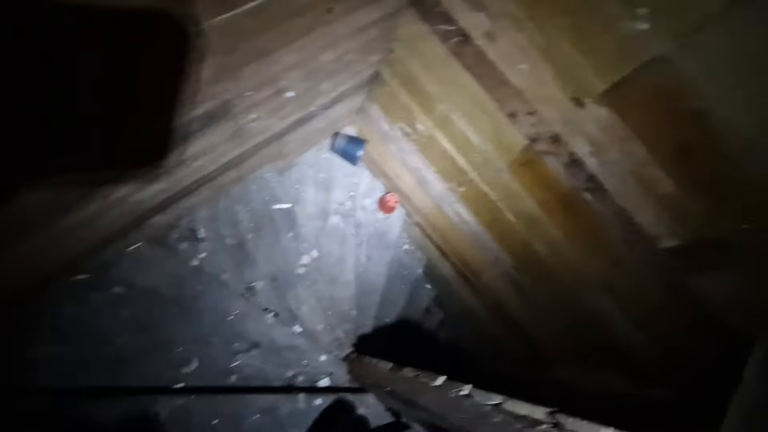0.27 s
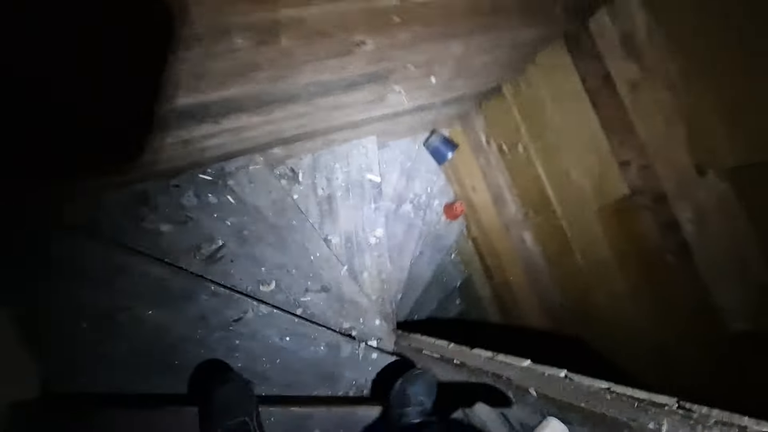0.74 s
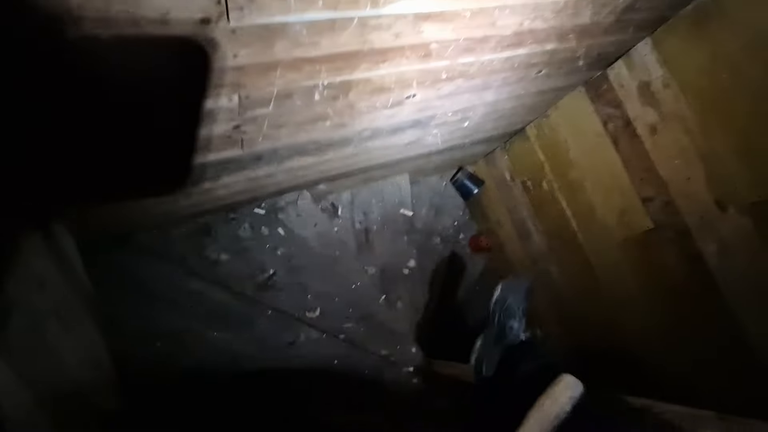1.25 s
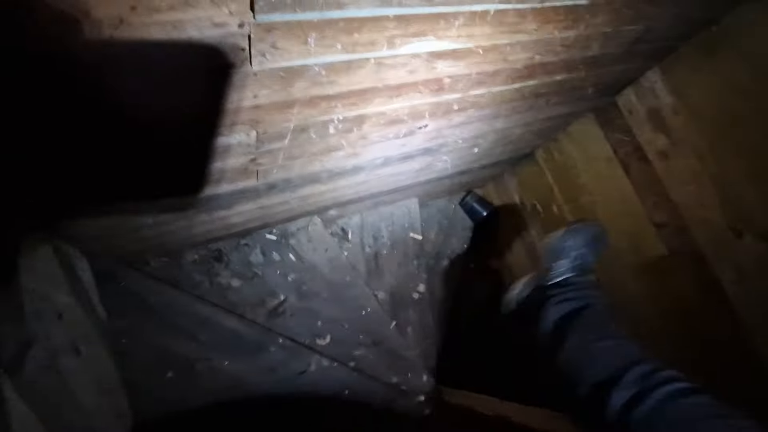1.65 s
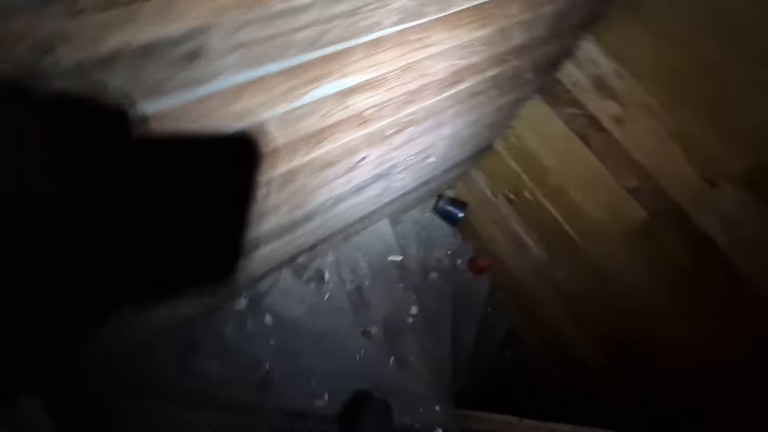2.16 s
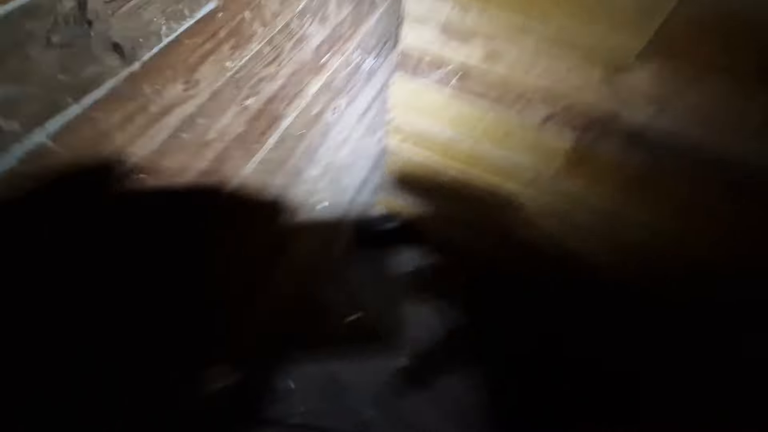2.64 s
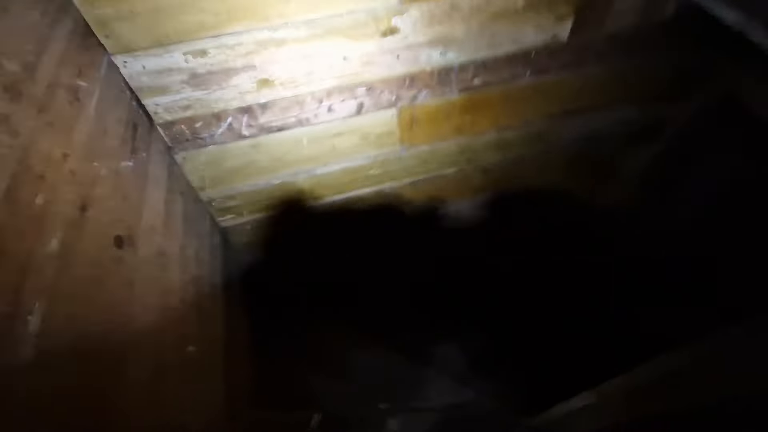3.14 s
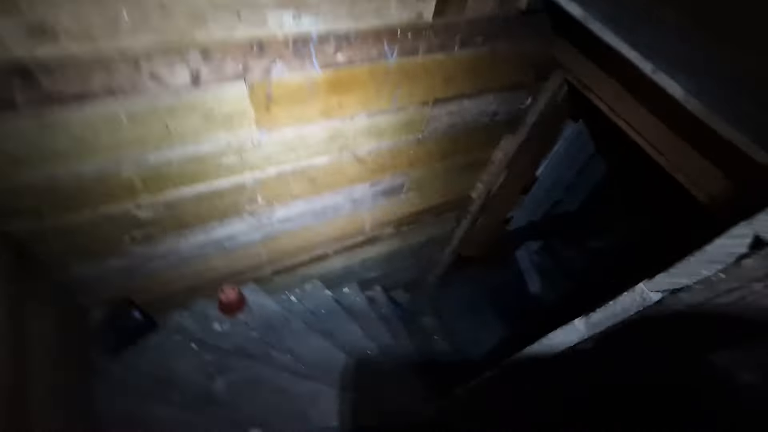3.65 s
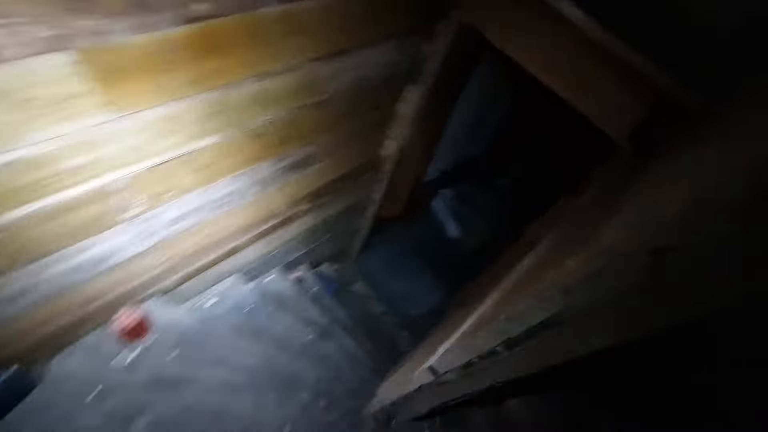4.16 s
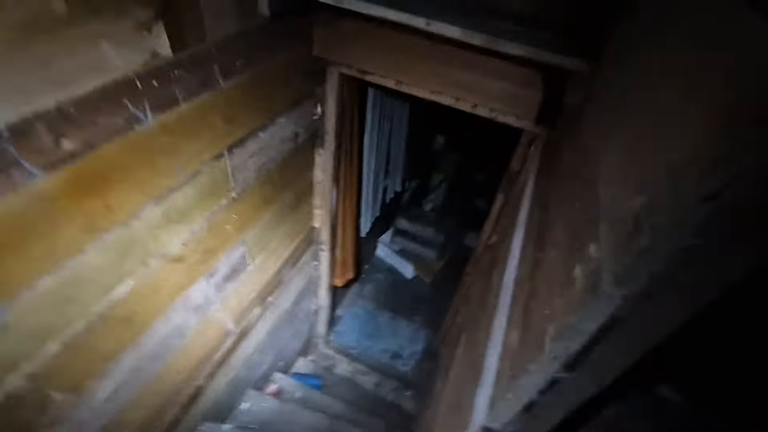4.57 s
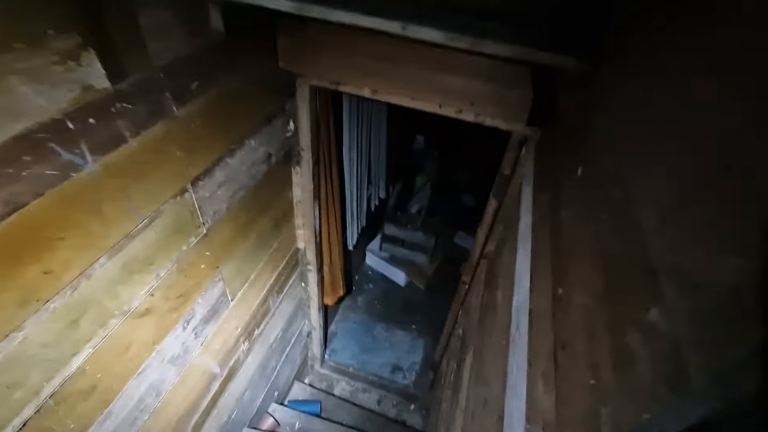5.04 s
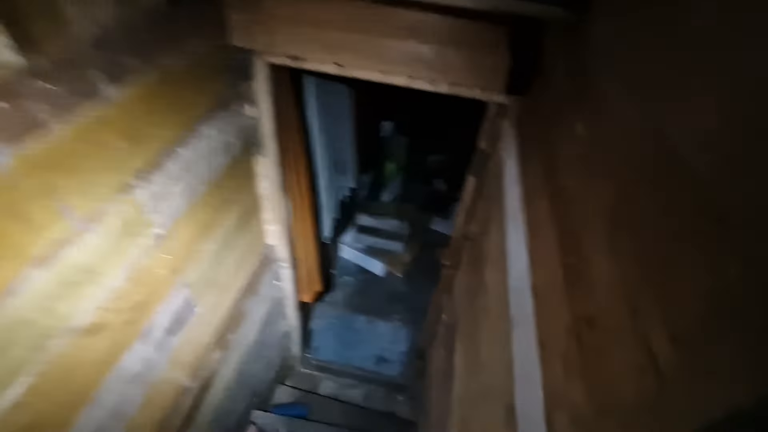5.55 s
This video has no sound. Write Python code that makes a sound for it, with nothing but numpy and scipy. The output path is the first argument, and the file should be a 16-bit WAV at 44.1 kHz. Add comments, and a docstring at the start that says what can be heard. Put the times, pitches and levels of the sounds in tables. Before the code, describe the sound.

Close stereo microphones in a quiet, empty wooden attic. A splinter ticks at the start, then light boot steps knock and murmur the planks. Steps grow heavier, with a hard cracking blow near three seconds, then clothes rustle and two more deep heel thuds fall. A tiny metal tag rings very high between them. Low rumble throughout.

```python
"""Two microphones in a quiet, empty building, someone in boots on old attic floorboards close by.
All along the building rumbles low, the boards murmur and clothes rustle near the microphones.
First a splinter ticks, then light steps knock the planks, with one very faint tinkle of a metal tag.
From 2.4 s the steps towards a steep wooden stair grow heavy: heels thud, planks knock or groan and
grit cracks, loudest near 3 s; more thuds follow at 4.3 and 5.7 s, with the tag ringing between them."""
import sys
import numpy as np
from scipy import signal
from scipy.io import wavfile
from scipy.ndimage import uniform_filter1d

SR = 44100
rng = np.random.default_rng(int(sys.argv[2]) if len(sys.argv) > 2 else 0)


def dump_mix(stems):
    """Bounce the given channels to the path in sys.argv[1] as a 16-bit WAV at rate SR."""
    frames = np.atleast_2d(stems).T  # one column per channel
    limited = np.clip(frames, -1, 1)  # hard clip at full scale
    pcm = np.round(limited * 32767).astype(np.int16)
    wavfile.write(sys.argv[1], SR, pcm)


N = 255780  # samples, 5.8 s

# Building and boards at rest. Each row: time in seconds, rumble level in dB, board murmur level in dB.
FLOOR_LEVELS = [(0, -44, -49), (.7, -41, -51), (1.1, -42.5, -51.5), (1.6, -43.5, -50.5),
                (2.3, -42.5, -49.5), (3.2, -43.5, -50.5), (3.9, -45.5, -51.5), (4.6, -46.5, -53.5),
                (5.2, -47.5, -57.5), (5.8, -46, -52)]
# Boards murmuring louder under a foot. Each row: time of most weight in seconds, murmur level in dB.
LOADINGS = [(.72, -46), (1.42, -44.5), (2.55, -45.5), (3.0, -47.5), (4.38, -48.5), (4.8, -50)]
# Colour of the building's rumble. Each row: frequency in Hz, relative level in dB per Hz.
RUMBLE_COLOUR = [(8.8, -35), (15, -5.5), (59, 3), (200, -15), (260, -46), (440, -120)]
# Colour of the boards' murmur. Each row: frequency in Hz, relative level in dB per Hz.
MURMUR_COLOUR = [(71, -46), (120, -3), (161, 5), (216, 0), (529, -7.5), (877, -9.5), (975, -12),
                 (1290, -14), (1420, -9.5), (2000, -43), (2600, -15), (4400, -120)]
# Likeness of the two microphones in noise. Each row: frequency in Hz, correlation from -1 to 1.
LIKENESS = [(60, 0.99), (130, 0.96), (290, 0.89), (640, 0.63), (1410, -0.17), (3100, 0.007), (6820, 0.11),
            (15000, -0.049)]
# Decay of the attic. Each row: frequency in Hz, time to fall by 60 dB in seconds.
ATTIC_DECAY = [(60, 0.58), (150, 0.067), (500, 0.28), (1500, 0.2), (5000, 0.21), (14000, 0.08)]
# Clothes in motion. Each row: time in seconds, rustle level in dB, sheen (treble) in dB, coarse rub in dB.
CLOTH_MOTION = [(0, -63.5, -1.5, 8.5), (.42, -63, 1.5, 1), (.9, -59.5, 1.5, -0.5), (1.4, -59.5, 2, 2),
                (1.52, -62, 1, 0), (1.59, -74, 1, 3), (1.78, -72, -3, 11.5), (2.05, -64, -2, 6),
                (2.3, -66.5, -1, 8), (2.43, -57, -0.5, 8), (2.7, -54.5, 3.5, 8), (2.9, -55, 1, 3),
                (3.08, -49, 1.5, 7.5), (3.22, -55, -2, 3), (3.66, -51.5, -6, 0), (3.91, -59, -5, -2.5),
                (4.25, -53.5, -4, 1), (4.55, -53.5, -2.5, -2.5), (4.66, -58.5, -4.5, 2.5),
                (4.97, -57, -5, 4), (5.1, -68, -3, 1), (5.4, -65.5, -6, 0), (5.8, -55.5, -6, 2.5)]
# Sleeve or trouser leg swishing past. Each row: start in seconds, length in seconds, level in dB.
SWISHES = [(0.25, 0.048, -65), (0.501, .08, -59.5), (0.67, 0.13, -53), (1.392, 0.093, -56.5),
           (1.623, 0.047, -67), (2.12, 0.075, -64), (2.596, 0.13, -60), (2.845, 0.027, -52.5),
           (3.26, 0.12, -53.5), (3.463, .16, -51), (4.57, 0.033, -58), (5.27, 0.045, -73)]
# Colour of the cloth. Each row: frequency in Hz, relative level in dB per Hz.
CLOTH_COLOUR = [(530, -31), (900, -0.5), (1080, -9.5), (1220, -6.5), (1460, -5), (2420, -7), (3110, -8.5),
                (3860, -8.5), (5750, -6), (8550, -12), (10900, -12), (12900, -9), (16000, -14.5)]
# Jolts of the metal tag. Each row: start in seconds, peak level in dB.
TINKLES = [(1.6172, -59), (2.592, -42), (4.8733, -40), (4.8803, -35), (4.8904, -37.5), (5.2789, -53)]
# Modes of the tag. Each row: frequency in Hz, relative level in dB, time to fall by 60 dB in seconds.
TAG_MODES = [(13400, 0, 0.066), (14800, -10, .09)]
# Splinter letting go. Each row: start in seconds, level in dB, pitch in Hz, length in cycles.
TICKS = [(.0147, -18.5, 1520, 1.33), (.1479, -31, 1360, 1), (.178, -42, 1300, 2.1),
         (2.335, -35.5, 1400, 1.3)]
# Grit under a sole. Each row: start in seconds, peak level in dB, extra fine dust in dB, left minus right in dB.
CRACKS = [(.416, -33, 5, 7), (1.5446, -42, 5, 7), (2.072, -37.5, -12, 0), (2.1146, -36, 3, -5),
          (2.152, -36.5, 13, -8), (2.3825, -26, 4, 3), (2.4604, -17.5, 4, 4.5), (2.4955, -16.5, 6.5, 2.5),
          (2.9028, -36, 0, -12), (2.958, -24, 4, -6), (2.9684, -2.5, 0.5, -4), (3.035, -18, -4, -5),
          (3.261, -35.5, -23, -12), (3.3424, -33, -3, -12), (4.273, -17, -3.5, -6), (4.3277, -33, -3, -10),
          (4.569, -35.5, 13, -18), (4.8685, -34, -5, -9), (5.4253, -44, -12, -11), (5.5785, -40, -2, -10),
          (5.652, -35, 5, -9), (5.673, -34, 5, -3), (5.6905, -25, -4, -4), (5.7488, -19, 5, -5),
          (5.7894, -29, 2, -8)]
# Colour of the grit. Each row: frequency in Hz, relative level in dB per Hz.
GRIT_COLOUR = [(590, -77), (1000, -8), (1220, -14), (2280, -13.5), (2560, -19.5), (3500, -9.5), (4170, -14),
               (5700, -10), (10100, -23), (13400, -18.5), (16000, -24)]
# Planks knocking or groaning together. Each row: start in seconds, peak level in dB, loudest pitch in Hz,
# left minus right in dB, contact time in seconds, fall of the modes away from that pitch in dB per octave.
KNOCKS = [(.412, -29, 650, 4.5, 0.024, 7.5), (.612, -34.5, 815, 4, 0.009, 25),
          (.631, -34, 850, 0, 0.0089, 23), (.7, -34, 440, 6, .015, 46), (.748, -35, 784, 8, 0.03, 42),
          (.773, -31.5, 470, 3.5, 0.046, 18), (1.35, -30.5, 510, 5, 0.086, 11),
          (1.407, -24.5, 576, 1.5, 0.026, 7), (1.41, -35, 1460, 15, .039, 6),
          (1.47, -37, 2550, 4, 0.041, 59), (1.547, -39, 550, 5, 0.012, 22), (1.838, -40, 695, 4, 0.02, 52),
          (1.94, -39, 695, 2, 0.016, 29), (2.063, -24.5, 536, 2.5, 0.053, 14),
          (2.117, -26.5, 800, 1, 0.035, 25), (2.12, -28, 2160, 3, 0.026, 28),
          (2.38, -20.5, 480, 6, .012, 10), (2.463, -20.5, 615, 1.5, 0.012, 1),
          (2.497, -19.5, 520, 1, 0.0077, 2), (2.57, -32, 900, -4, 0.019, 20),
          (2.706, -28.5, 850, 2, 0.014, 23), (2.87, -27.5, 616, -12, 0.0035, 22),
          (2.958, -6.5, 257, 0, .011, 16.5), (2.967, -8.5, 900, 3, .011, 7),
          (3.036, -14.5, 615, 4.5, 0.012, 23), (3.225, -38, 418, 0, 0.018, 16),
          (3.252, -38.5, 695, 11, 0.024, 38), (3.368, -32, 700, 2.5, 0.035, 70),
          (3.52, -34.5, 695, 3, 0.039, 25), (3.57, -28, 1020, -5, 0.0088, 37),
          (3.772, -33, 890, 2, 0.032, 39), (4.144, -32.5, 900, 7, 0.0066, 14),
          (4.272, -13.5, 230, 0, 0.016, 30), (4.272, -15, 512, -3, 0.0079, 29),
          (4.274, -30.5, 2220, 9, 0.01, 40), (4.419, -30, 1960, -6, 0.0063, 31),
          (4.454, -33, 516, 3, 0.02, 30), (4.519, -33.5, 817, 0, 0.038, 52),
          (4.52, -35, 2220, -4, 0.051, 35), (4.698, -24, 930, 2, 0.0089, 56),
          (4.702, -33, 2040, -4, 0.022, 44), (4.724, -23.5, 490, 0, 0.0064, 11.5),
          (4.815, -31, 1000, 0, 0.025, 55), (4.867, -26.5, 510, 1, .01, 7), (4.928, -33.5, 900, 0, .04, 41),
          (4.93, -41, 2220, -1, .024, 60), (5.036, -41.5, 895, 3, 0.011, 32),
          (5.578, -40, 910, 1, 0.0072, -4), (5.691, -10.5, 235, 1, 0.011, 23.5),
          (5.692, -21, 504, 2.5, 0.011, 40), (5.779, -33, 445, 2, 0.022, 20)]
# Modes of the planks. Each row: frequency in Hz, relative level in dB, time to fall by 60 dB in seconds.
PLANK_MODES = [(188.7, -8.5, 0.25), (231, -7, 0.12), (253, -7.5, 0.1), (308, -28, 0.099),
               (339.6, 1.5, 0.13), (379.5, 2.5, 0.078), (420, -4.5, 0.14), (520, 2.5, 0.044),
               (588, 0.5, 0.075), (627, -2, 0.049), (694.6, 4, 0.067), (794, 3, 0.071), (877, 7.5, 0.031),
               (975, -8.5, 0.021), (1055, 12.5, 0.016), (1330, 7, 0.043), (1456, 10, 0.047),
               (1520, 9, 0.04), (1626, 2, 0.04), (2000, 14.5, 0.015), (2160, -5, .025), (2216, 7, 0.044),
               (2260, -2, 0.027), (2520, -2, .025), (2840, 7, .025)]
# Heel and toe blows. Each row: start in seconds, level in dB, bending pitch of the board in Hz, cycles
# before it is damped.
THUDS = [(.412, -26, 298, 2.2), (.43, -30, 53, 1.2), (0.514, -32.5, 167, 5), (.615, -31, 65, 3.7),
         (1.362, -33.5, 160, 3.4), (1.406, -29, 330, 2.7), (2.066, -32, 350, 10),
         (2.379, -8.5, 129.7, 1.62), (2.478, -26.5, 149, 3.3), (2.495, -32, 53.6, 2),
         (2.545, -33, 71.5, 2.4), (2.58, -36, 87, 3), (2.868, -31.5, 127, 1.5), (2.957, -15, 159, 4.9),
         (2.959, -14, 374, 4.1), (2.972, -15.5, 356, 6.8), (3.471, -34, 192, 2.9), (4.272, -2, 353, 4.5),
         (4.275, -9.5, 165.6, 3.1), (4.725, -20.5, 185, 2.5), (4.765, -29, 149, 1.8), (5.52, -39, 59, 7.7),
         (5.689, -7.5, 135, 2.25), (5.691, -16.5, 303, 4.2)]
# Beams under the boards. Each row: frequency in Hz, relative level in dB, time to fall by 60 dB in seconds.
JOIST_MODES = [(63, -13, 0.36), (91, -6, 0.6), (114.5, 0.5, 0.31), (154.7, 1.5, 0.18), (182.6, -13, 0.4),
               (231, -0.5, 0.38), (282, -3, 0.27)]

LOADING_S = .09  # width of the bell-shaped swell of the murmur
SWISH_RISE_S, SWISH_FALL_S = 0.017, 0.024
SNAP_RISE_S, SNAP_FALL_S = .003, .002
CRUSH_S, CRUSH_SHARE = 0.011, 0.21  # the smaller grains after every snap
LOAD_S, LOAD_SHARE = 0.0014, 0.066  # a contact builds up in a short time plus a share of its length
JOISTS_DB = -58  # strength of the beams' answer to one sample of push
WALL_S, WALL_DB, WALL_HZ = .044, -14.5, 286  # delay, level and low-pass corner of the gable's echo
CLIP_LEVEL = .93  # share of full scale
BASS_HZ, EDGE_HZ = 32., 16200  # lower and upper limits of the microphone chain


def gain_of(db):
    """Decibels to a factor."""
    return 10 ** (np.asarray(db) / 20)


def evened(x):
    """Scaled to rms 1."""
    return x / np.sqrt(np.mean(x ** 2) + 1e-20)


def peaked(x):
    """Scaled to peak 1."""
    return x / np.abs(x).max()


def read(points, hz):
    """A table of (Hz, value) read on a log-frequency axis."""
    f, value = np.transpose(points)
    return np.interp(np.log(hz + 1), np.log(f + 1), value)


def add(mix, s, sound):
    """Mixes a sound into both channels at s seconds."""
    part = mix[:, round(s * SR):][:, :sound.shape[-1]]
    part += sound[..., :part.shape[1]]


def panned(x, pan_db):
    """Splits a left minus right level difference over the two channels."""
    return x * gain_of(np.array([[.5], [-.5]]) * pan_db)


def noise(shape_db, length, size, patchy_db):
    """Two-channel noise from random short-time spectra, coloured by shape_db(hz, t); bass is alike in both."""
    hop = size // 4
    frames, hz = length // hop + 5, np.fft.rfftfreq(size, 1 / SR)[:, None]
    a, b, c, d, patches = rng.standard_normal((frames, len(hz), 5)).T
    # random level patches, smooth over time and frequency
    patches = uniform_filter1d(patches, size=size // 64, axis=0)
    patches = evened(uniform_filter1d(patches, size=6, axis=1))
    same = np.clip(read(LIKENESS, hz), -1, 1)
    left = a + 1j * b
    right = same * left + np.sqrt(1 - same ** 2) * (c + 1j * d)
    level_db = shape_db(hz, np.arange(frames) * hop / SR) + patchy_db * patches
    spectra = np.array([left, right]) * gain_of(level_db)
    return signal.istft(spectra, nperseg=size, noverlap=size - hop)[1][:, :length]


def modes(table, tilt_db):
    """Impulse response of dying sines, each mode's level shifted by tilt_db(hz)."""
    t = np.arange(SR // 3) / SR
    return sum(gain_of(db + tilt_db(hz) - 60 * t / t60) * np.sin(2 * np.pi * hz * t)
               for hz, db, t60 in table)


def floor():
    """The building's low rumble and the lumpy murmur of boards that swells under weight."""
    s, rumble_db, murmur_db = np.transpose(FLOOR_LEVELS)
    t = np.arange(N) / SR
    rumble = evened(noise(lambda hz, t: read(RUMBLE_COLOUR, hz) + 0 * t, N, size=4096, patchy_db=1.0))
    murmur = evened(noise(lambda hz, t: read(MURMUR_COLOUR, hz) + 0 * t, N, size=1024, patchy_db=1.5))
    weight = sum(gain_of(db) ** 2 * np.exp(-((t - at) / LOADING_S) ** 2) for at, db in LOADINGS)
    murmur_gain = np.sqrt(gain_of(np.interp(t, s, murmur_db)) ** 2 + weight)
    return gain_of(np.interp(t, s, rumble_db)) * rumble + murmur_gain * murmur


def attic(x):
    """Dense reflections off bare planks, each band dying at its own speed."""
    tail = noise(lambda hz, t: -60 * t / read(ATTIC_DECAY, hz), SR // 2, size=512, patchy_db=1)
    tail = np.pad(tail, ((0, 0), (round(.004 * SR), 0)))  # 4 ms before the first reflections
    return signal.fftconvolve(x, tail / np.linalg.norm(tail[0]), axes=1)[:, :N]


def gable_echo(low):
    """The far gable returns the low blows once, late and dulled."""
    late = np.pad(low, ((0, 0), (round(WALL_S * SR), 0)))[:, :N]
    return signal.lfilter(*signal.butter(1, WALL_HZ, fs=SR), gain_of(WALL_DB) * late)


def cloth():
    """Fabric slides: fine hiss whose sheen and coarse rub change with movement, flickering as folds catch."""
    s, level_db, sheen_db, rub_db = np.transpose(CLOTH_MOTION)
    # weights from 0 to 1: sheen above 7500 Hz, rub below 4000 Hz
    high = lambda hz: np.clip(np.log2((hz + 1) / 7500) / 0.28, 0, 1)
    low = lambda hz: np.clip(np.log2(4000 / (hz + 1)) / 0.35, 0, 1)
    colour = lambda hz, t: (read(CLOTH_COLOUR, hz) + high(hz) * np.interp(t, s, sheen_db)
                            + low(hz) * np.interp(t, s, rub_db))
    hiss = noise(colour, N, size=256, patchy_db=1.5)
    # the band between the two sets the level scale
    core = signal.sosfilt(signal.butter(4, [4000, 8000], "band", fs=SR, output="sos"), hiss.mean(0))
    flicker_db = 0.93 * evened(uniform_filter1d(rng.standard_normal(N), size=600))
    t = np.arange(N) / SR
    power = gain_of(np.interp(t, s, level_db)) ** 2
    for start, length, db in SWISHES:
        corners = np.cumsum([start - SWISH_RISE_S, SWISH_RISE_S, length, SWISH_FALL_S])
        power = power + (gain_of(db) * np.interp(t, corners, [0, 1, 1, 0])) ** 2
    return panned(np.sqrt(power) * gain_of(flicker_db) * hiss / core.std(), -0.93)


def tag():
    """A small metal tag on the clothes, to the right, rings very high when it is jolted."""
    out, ring = np.zeros((2, N)), peaked(modes(TAG_MODES, lambda hz: 0))
    for s, db in TINKLES:
        add(out, s, panned(gain_of(db) * ring, -10.0))
    return out


def swings(table):
    """Wood first gives way, swings a few cycles under a rounded envelope and is damped."""
    out = np.zeros((2, N))
    for s, db, hz, cycles in table:
        turns = np.arange(0, cycles, hz / SR)
        envelope = np.sin(np.pi * (turns / cycles) ** 0.68) ** 1.3
        # the minus sign makes the first movement a giving way
        add(out, s, -gain_of(db) * envelope * np.sin(2 * np.pi * turns))
    return out


def splinter_ticks():
    """A splinter lets go with a dry tick of a cycle or two, to the left."""
    return panned(swings(TICKS), 9.5)


def cracks():
    """Grit under a sole: a sharp snap followed by a crush of smaller grains."""
    out, t = np.zeros((2, N)), np.arange(SR // 6) / SR
    grit = noise(lambda hz, t: read(GRIT_COLOUR, hz) + 0 * t, len(t) * len(CRACKS), size=256, patchy_db=1)
    dust = signal.sosfiltfilt(signal.butter(4, 9000, "high", fs=SR, output="sos"), grit)
    snap, crush = np.exp(-t / SNAP_FALL_S), np.exp(-t / CRUSH_S)
    fade = (1 - CRUSH_SHARE) * snap + CRUSH_SHARE * crush
    envelope = np.minimum(t / SNAP_RISE_S, 1) ** 2 * fade
    for k, (s, db, dust_db, pan_db) in enumerate(CRACKS):
        own = slice(k * len(t), (k + 1) * len(t))  # a fresh stretch of noise for each crack
        grains = grit[:, own] + (gain_of(dust_db) - 1) * dust[:, own]
        add(out, s, panned(gain_of(db) * peaked(grains * envelope), pan_db))
    return out


def knocks():
    """A rough contact rings the plank modes that lie near the spot's loudest pitch."""
    out, t = np.zeros((2, N)), np.arange(SR // 6) / SR
    rough = noise(lambda hz, t: 0 * hz * t, len(t) * len(KNOCKS), size=1024, patchy_db=-0.5)
    # the wood sticks and slips, so the push comes in uneven jerks a few ms apart
    jerks_db = 1.86 * evened(uniform_filter1d(rng.standard_normal(rough.shape[1]), size=90))
    rough = rough * gain_of(jerks_db)
    for k, (s, db, pitch, pan_db, contact, spread_db) in enumerate(KNOCKS):
        rise = LOAD_S + LOAD_SHARE * contact
        load = np.minimum(t / rise, 1) * np.exp(-(t / contact) ** 1.96)
        push = rough[:, k * len(t):][:, :len(t)] * load
        ring = modes(PLANK_MODES, lambda hz: -spread_db * abs(np.log2(hz / pitch)))
        knock = peaked(signal.fftconvolve(push, ring[None], axes=1))
        add(out, s, panned(gain_of(db) * knock, pan_db))
    return out


def beams(low):
    """The joists under the boards ring on as the low blows push them."""
    ring = modes(JOIST_MODES, lambda hz: JOISTS_DB)
    return signal.fftconvolve(low, ring[None], axes=1)[:, :N]


def footfalls():
    """Heel and toe blows bend the boards, which the resting foot soon damps."""
    return swings(THUDS)


def scene():
    """Steps with their beams, echo and room, over cloth and floor."""
    low, high, ticks = footfalls(), knocks() + cracks() + tag(), splinter_ticks()
    steps = panned(low + beams(low) + gable_echo(low), 1.0) + high + ticks
    room = attic(gain_of(-13.0) * low + gain_of(-7.5) * high + gain_of(-11.0) * ticks)
    return steps + room + cloth() + floor()


def record(dry):
    """The microphones lose the deepest bass, peaks are clipped, then the top treble is cut."""
    thinned = signal.lfilter(*signal.butter(2, BASS_HZ, "high", fs=SR), dry)
    held = np.clip(thinned, -CLIP_LEVEL, CLIP_LEVEL)
    band_limit = signal.firwin(511, EDGE_HZ, window=("kaiser", 9), fs=SR)
    return signal.oaconvolve(held, band_limit[None], "same")


dry = scene()
out = record(dry)
dump_mix(out)
```